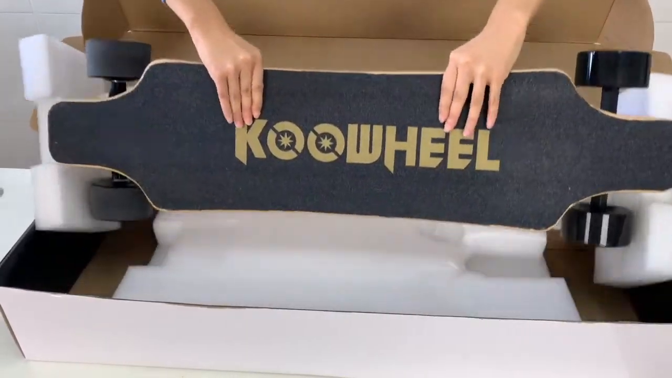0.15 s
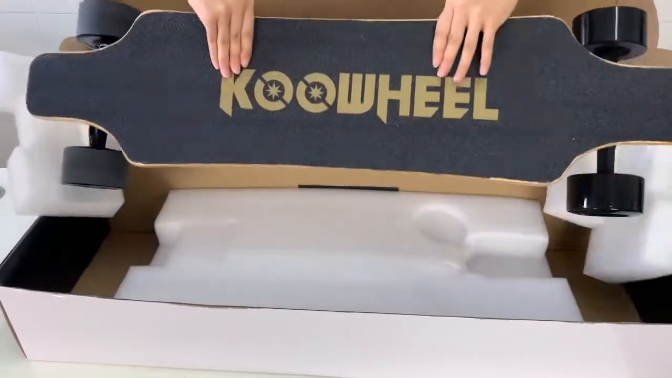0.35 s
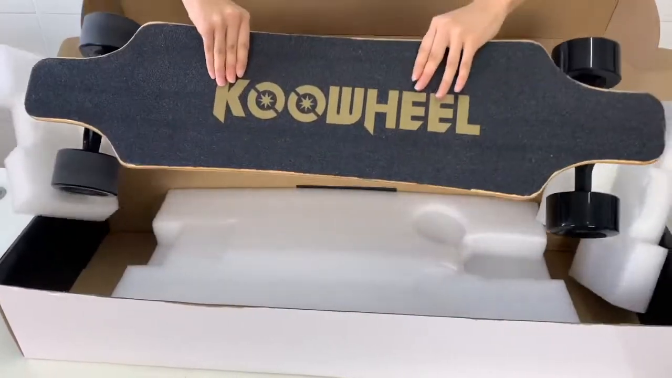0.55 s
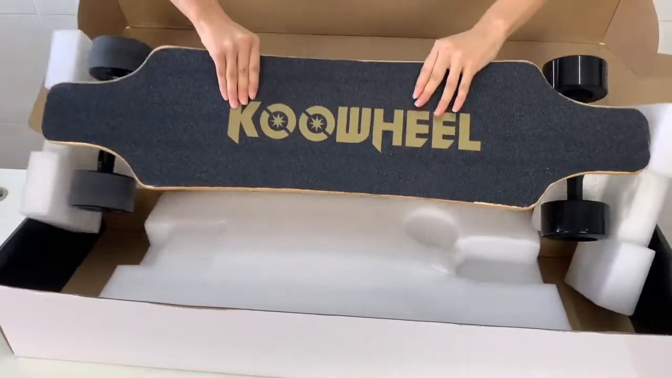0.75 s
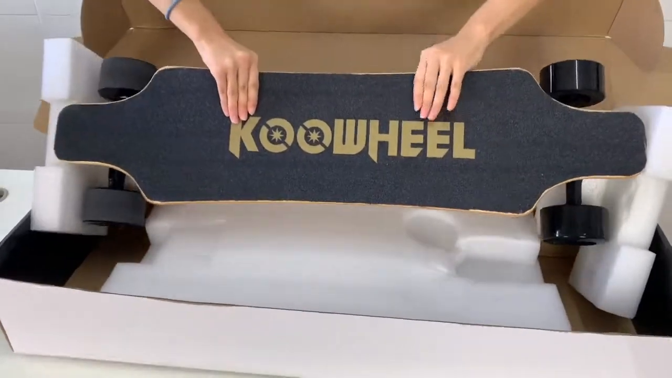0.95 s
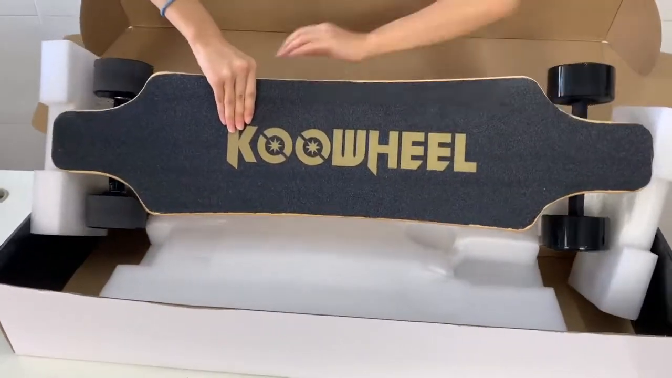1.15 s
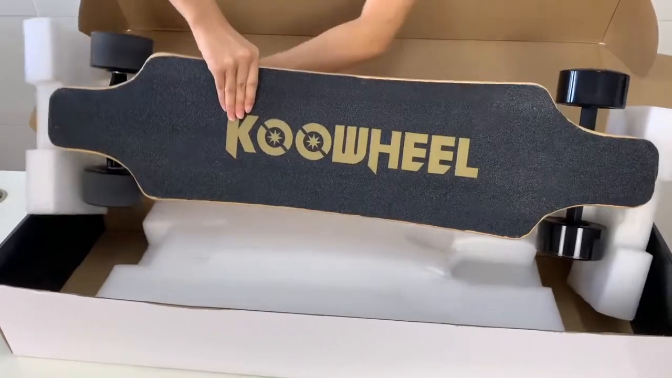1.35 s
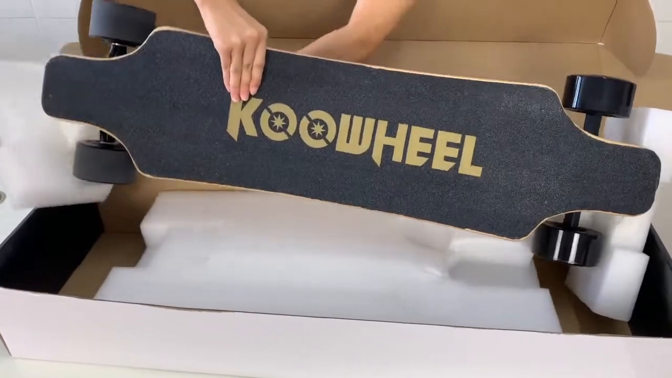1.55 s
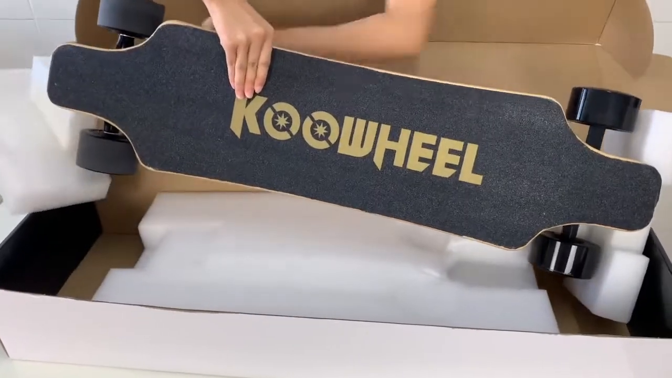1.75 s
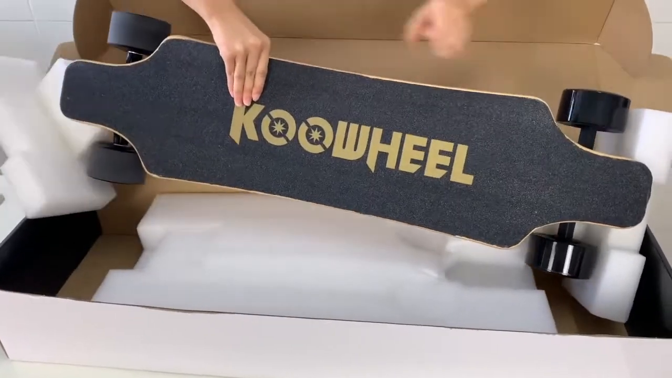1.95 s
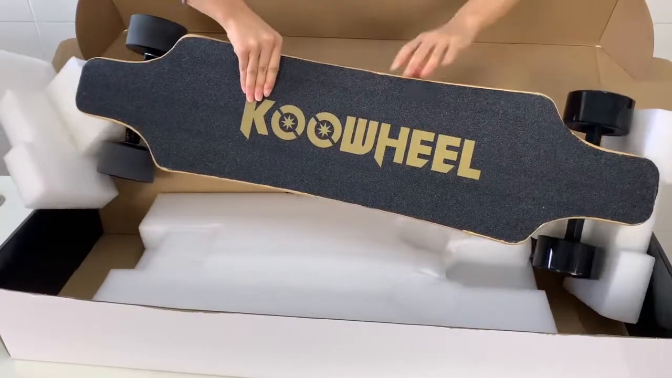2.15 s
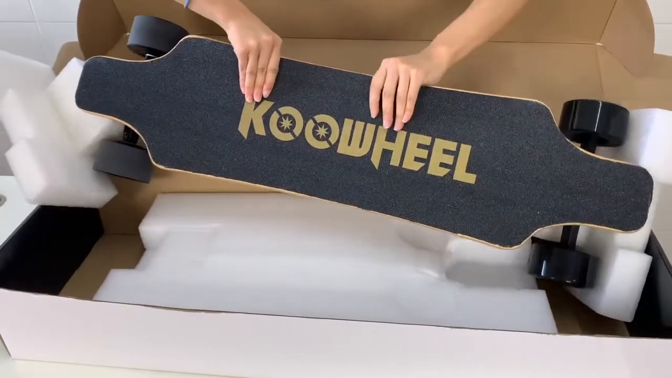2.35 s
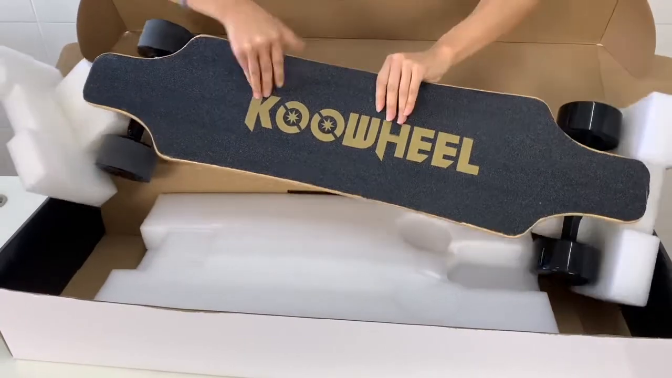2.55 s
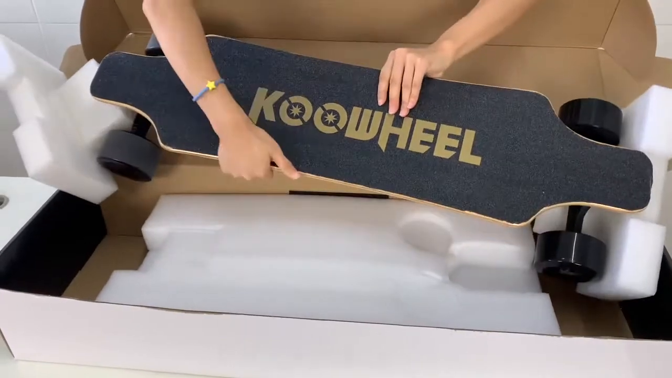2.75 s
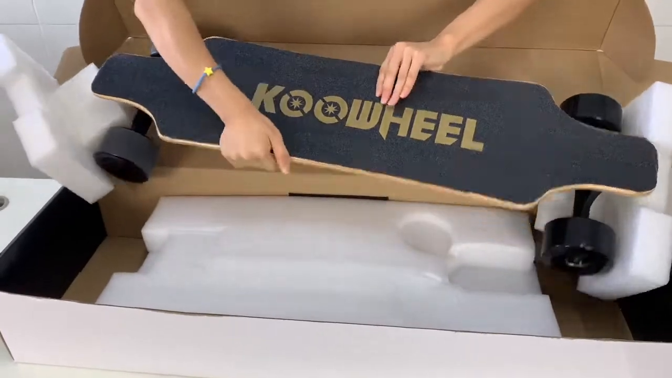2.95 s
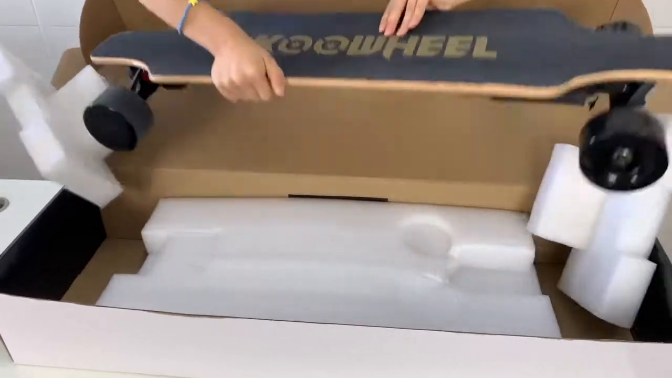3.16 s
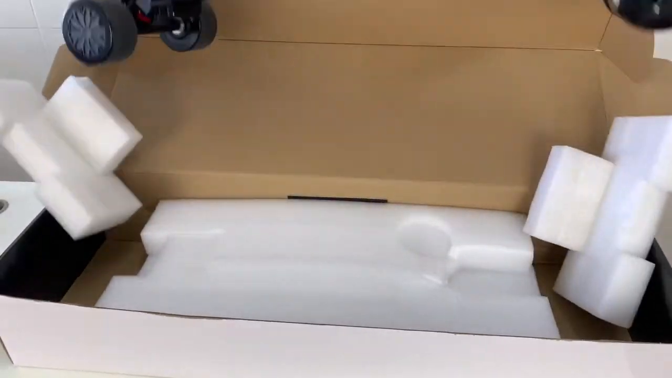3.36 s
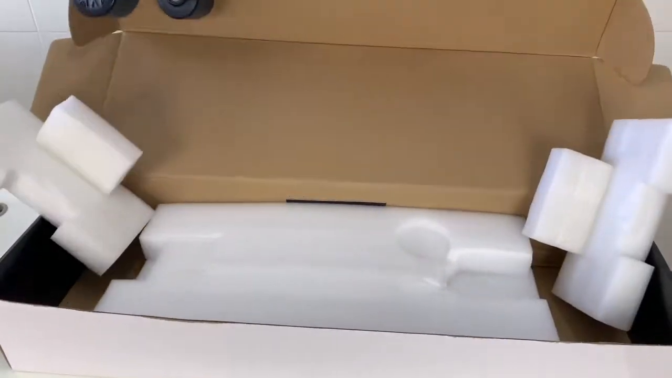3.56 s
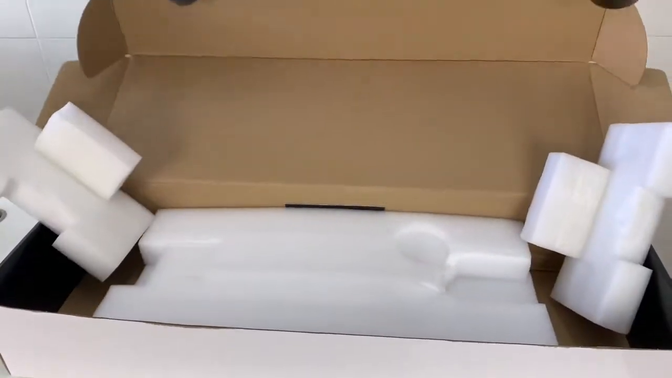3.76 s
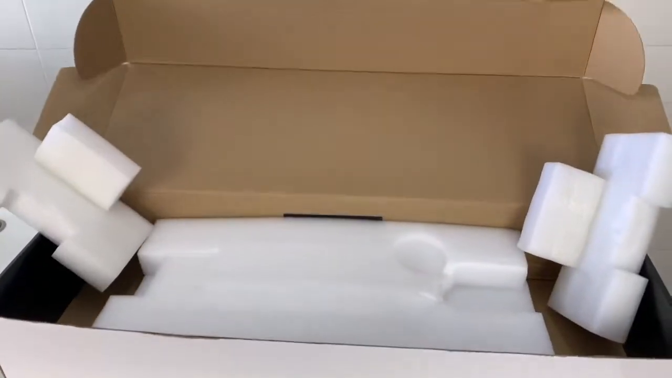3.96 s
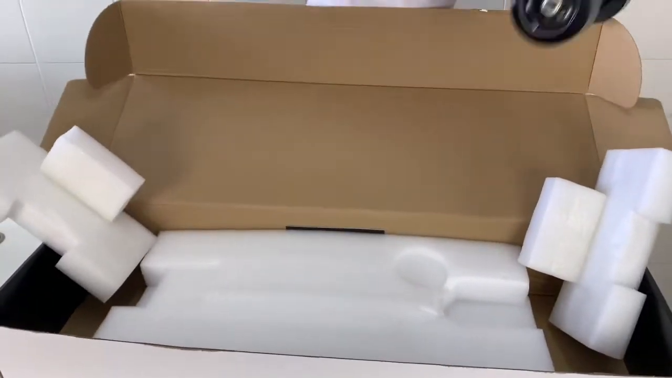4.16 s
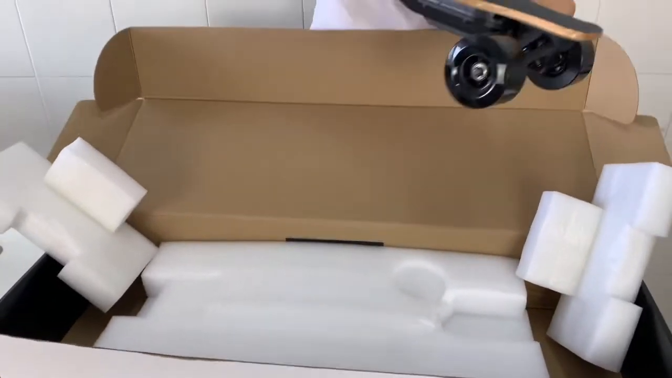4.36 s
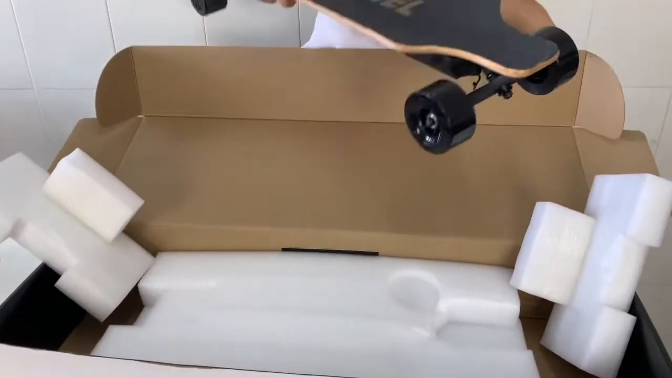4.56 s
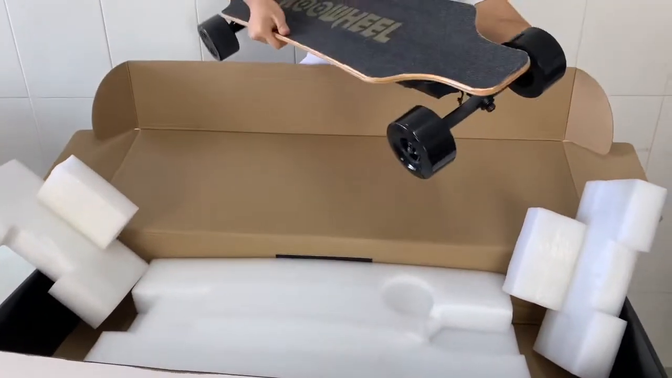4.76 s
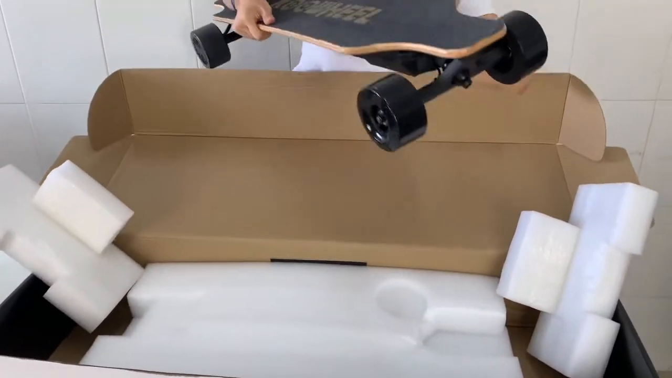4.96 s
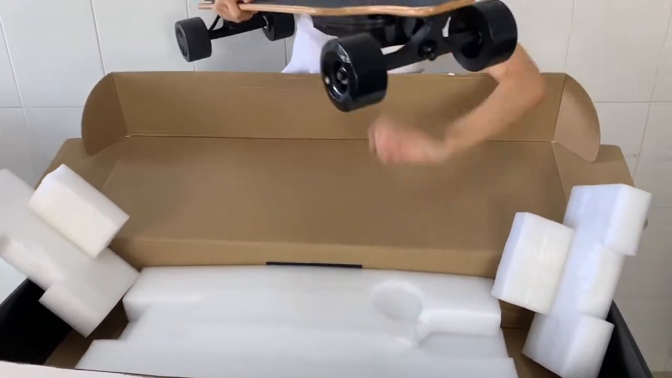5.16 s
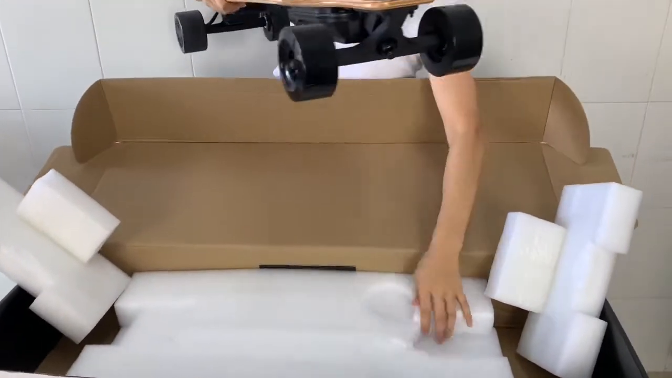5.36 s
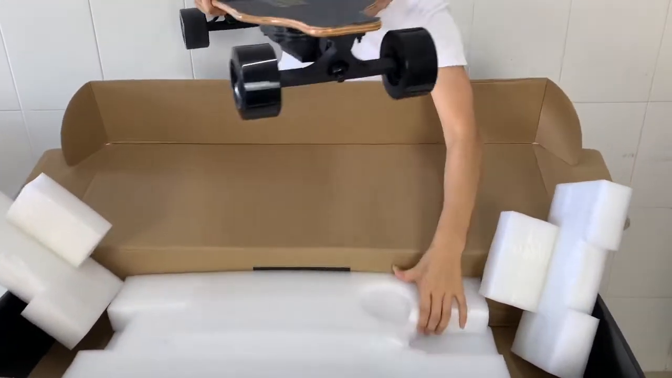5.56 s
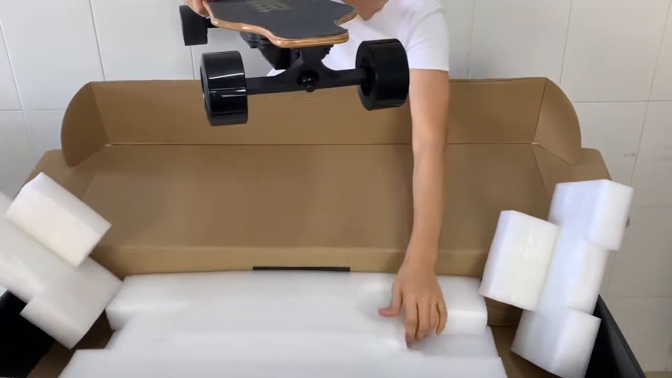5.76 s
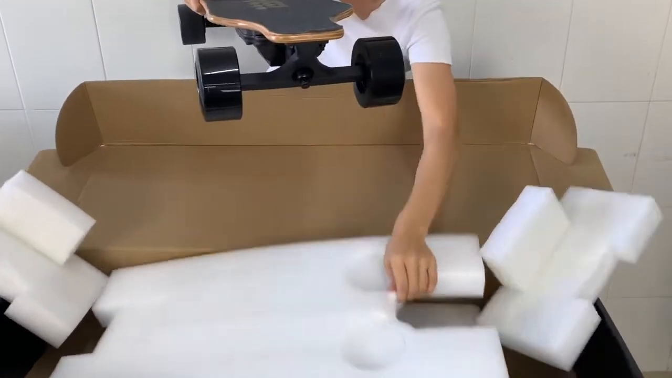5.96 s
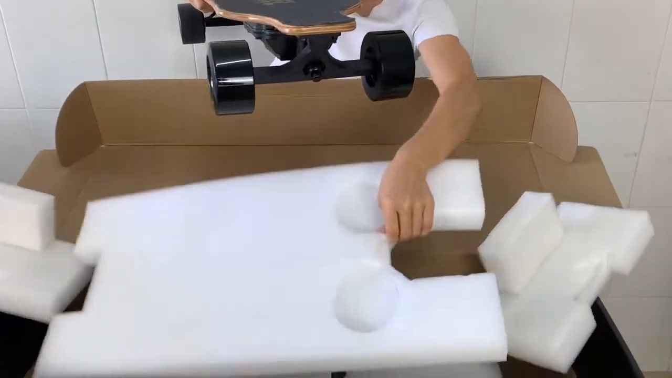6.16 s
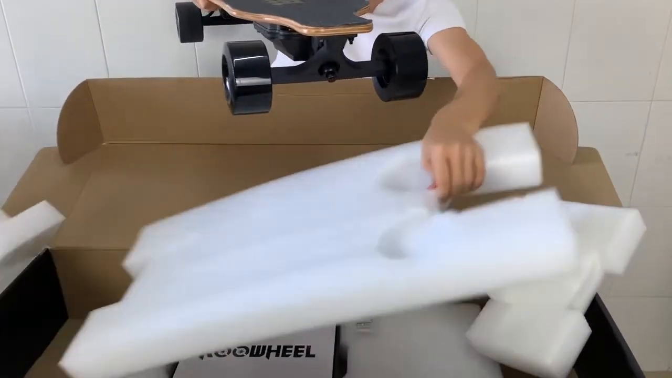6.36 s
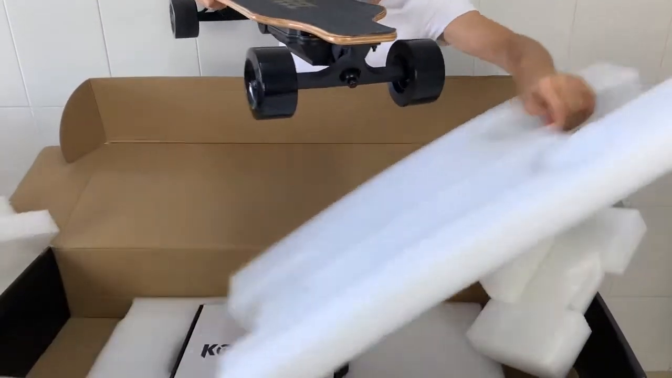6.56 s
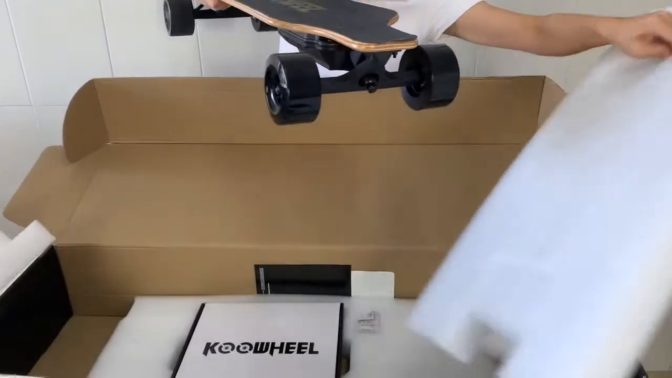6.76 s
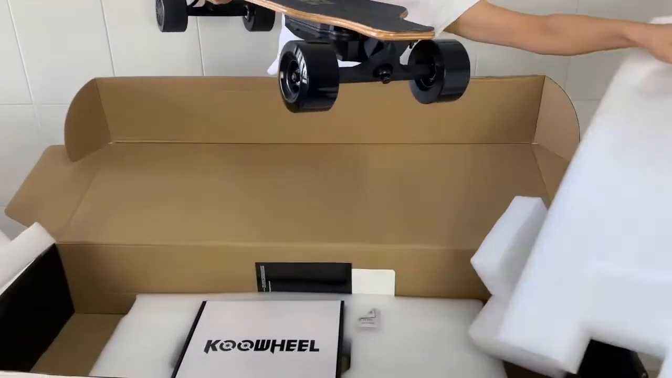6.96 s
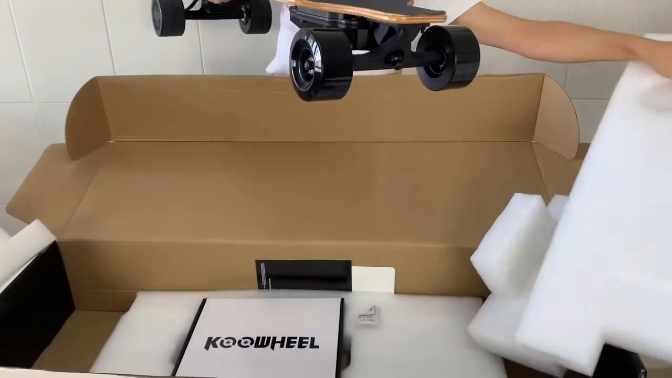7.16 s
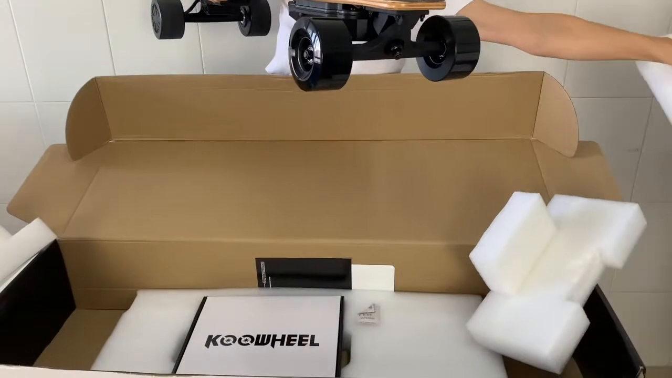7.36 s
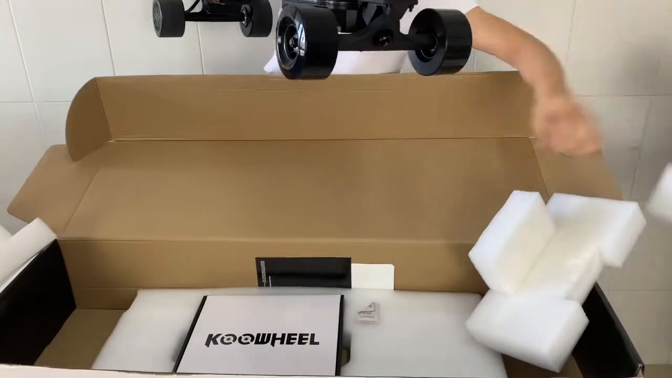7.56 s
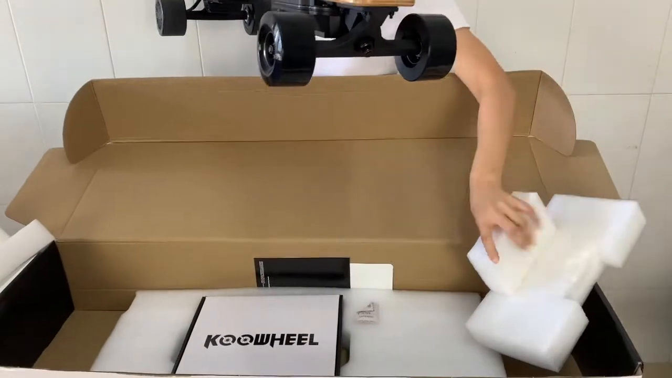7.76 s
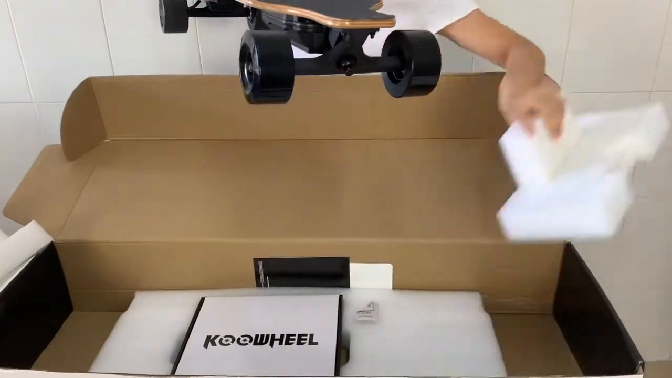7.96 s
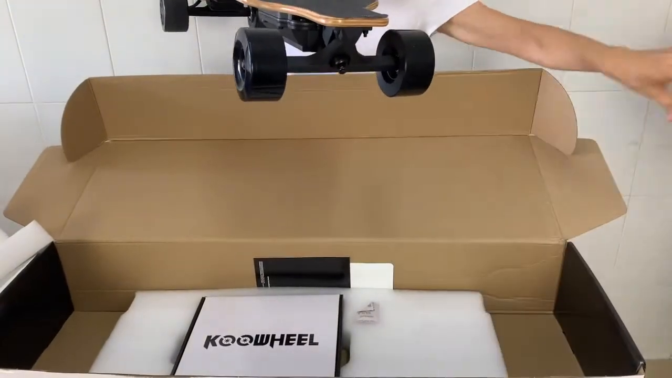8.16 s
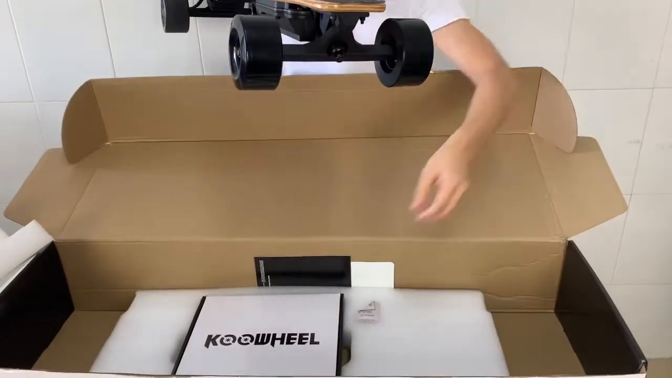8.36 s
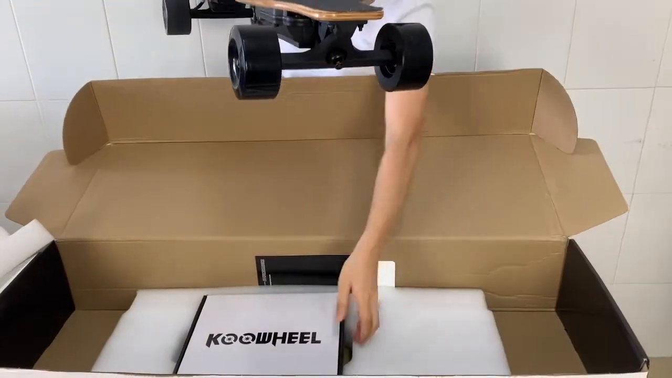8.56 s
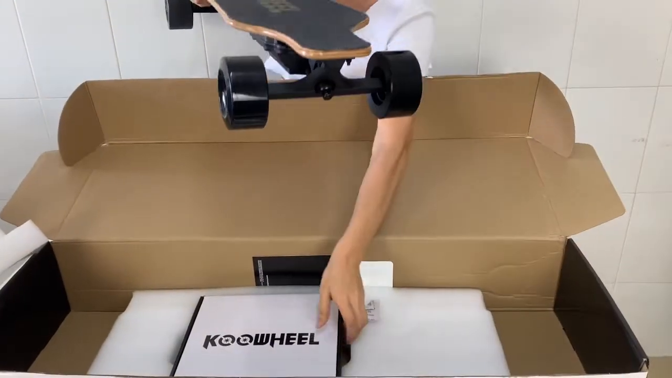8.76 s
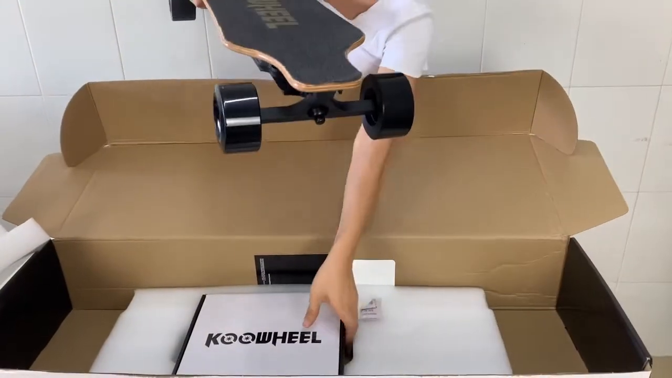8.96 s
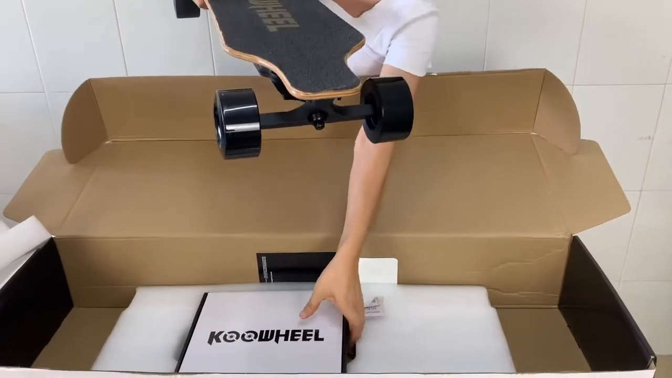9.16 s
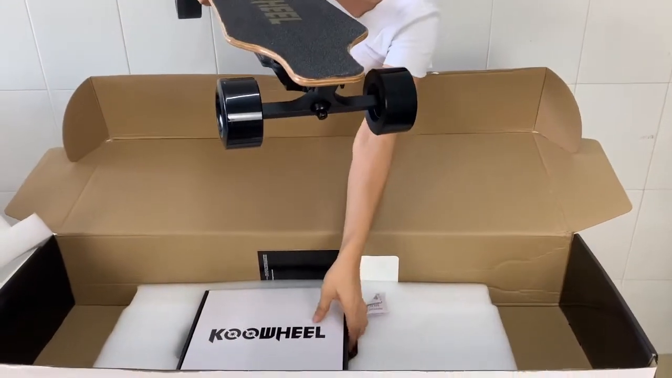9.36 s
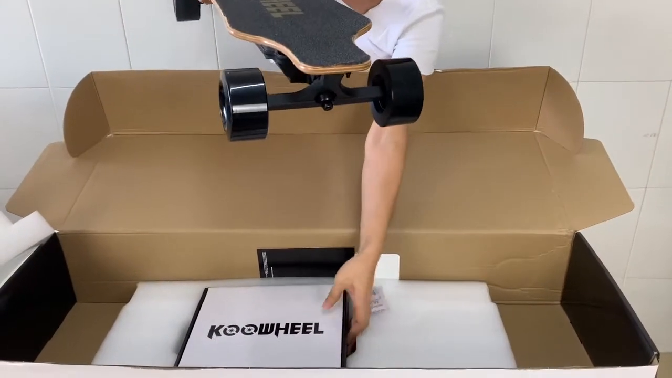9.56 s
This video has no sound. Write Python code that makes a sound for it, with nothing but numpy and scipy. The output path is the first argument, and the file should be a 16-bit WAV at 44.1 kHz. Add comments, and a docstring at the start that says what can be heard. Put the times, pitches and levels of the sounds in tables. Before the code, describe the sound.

Foam packing rubs crisply against cardboard, with sharp little snaps, short squeaks and boxy low knocks crowding the opening. The handling thins after a deep thump, leaving faint rustling over low room tone. Midway the rubbing returns with squeaks and thuds as packing comes away, then a heavy scuff and softer taps. Close microphone, short hard-room reflections, narrow bass and wide midrange.

```python
"""A heavy board is lifted out of a cardboard box on a tiled floor and the foam packing is pulled out after it.
Rubbing foam hisses from the start as shaped noise; snaps, squeaks and scuffs join it as bursts and tones.
Knocks of decaying tones and noise crowd the first second and a half, and a deep one lands near 3.5 s.
After a thinner stretch the rubbing returns from 5.2 s; a strong scuff comes at 8 s, then small knocks.
A quiet hard room answers with decaying noise; the stereo is narrow in the bass and wide in the middle."""
import sys
import numpy as np
from scipy import signal
from scipy.fft import rfft, irfft, next_fast_len
from scipy.io import wavfile
from scipy.ndimage import uniform_filter1d, map_coordinates

SR = 44100
rng = np.random.default_rng(int(sys.argv[2]) if len(sys.argv) > 2 else 0)


def generate_wav(sig):
    """Save sig (samples, or channels by samples) to the path in sys.argv[1] as 16-bit PCM at SR."""
    pcm = np.round(np.clip(np.atleast_2d(sig).T, -1, 1) * 32767).astype(np.int16)
    wavfile.write(sys.argv[1], SR, pcm)


N = 423360  # samples, 9.6 s

# Spectra of the noise layers, relative to each other within a table: f/Hz, level/dB
ROOM_TONE_SPECTRUM = [(33, -27), (41, 0), (53, 6.5), (102, -0.5), (476, -20.5), (560, -18), (734, -13),
                      (1610, -24.5), (1790, -23), (2990, -18), (3340, -25.5), (4370, -23.5), (16000, -105)]
HISS_SPECTRUM = [(900, -12), (1800, 1.5), (2500, 1.5), (4000, 1.5), (5500, -4.5), (7000, -7), (9000, -54),
                 (12000, -71.5)]
SIZZLE_SPECTRUM = [(6000, -12), (8000, 1.5), (10500, 3.5), (13000, -0.5), (15800, -0.5), (16300, -50.5)]
SCRAPE_SPECTRUM = [(250, -17.5), (480, -4.5), (750, 2), (1100, -1.5), (1700, -5.5), (2600, -33)]
RUMBLE_SPECTRUM = [(30, -19), (60, -2), (120, 2.5), (190, -2), (270, -0.5), (390, -4), (520, -11.5),
                   (900, -55)]
# Decay of the room: f/Hz, time to fall 60 dB/s
ROOM_DECAY = [(100, 0.31), (400, 0.38), (1500, 0.39), (5000, 0.27), (14000, 0.031)]
# Likeness of left and right before the phase turn: f/Hz, correlation (0-1)
STEREO_LIKENESS = [(60, 0.93), (290, 0.92), (640, 0.47), (1400, 0.21), (3000, 0.05), (5500, 0), (7500, 1),
                   (16000, 0.69)]
# Phase between left and right: f/Hz, phase/rad
STEREO_PHASE = [(0, 0), (6200, 0), (8600, -np.pi), (13400, -3 * np.pi), (17000, -4.5 * np.pi)]
# Single foam cells that burst: t/s, peak level/dB
SNAPS = [(0.0304, -29.5), (0.606, -30), (1.0684, -28), (1.4662, -13.5), (2.798, -34), (2.8877, -32),
         (3.2796, -20), (5.724, -42), (6.1281, -21), (6.3406, -29), (7.9643, -27), (8.6608, -26)]
# Foam edges that stick and slip: t/s, length/s, f/Hz, level/dB, pitch unsteadiness (0-1)
SQUEAKS = [(0.059, 0.035, 3850, -38, 0.05), (0.076, .025, 3070, -42, 0.06), (0.755, 0.032, 1695, -37, 0.11),
           (0.756, 0.029, 3200, -38.5, 0.07), (0.809, 0.03, 1876, -45, 0), (1.548, 0.082, 4140, -42, 0.06),
           (1.547, 0.046, 1707, -35, 0.24), (1.574, 0.051, 2440, -38.5, .15),
           (2.381, 0.058, 1260, -40.5, 0.17), (2.399, .04, 2240, -38.5, 0.04), (2.412, 0.036, 3970, -39, 0),
           (2.541, 0.0048, 1010, -33, 0), (2.543, 0.011, 1496, -37, 0.13), (2.729, .012, 876, -52, 0.03),
           (3.278, 0.031, 993, -38.5, 0.15), (3.83, 0.051, 734, -49.5, 0.12),
           (4.995, 0.022, 1950, -54, 0.06), (5.215, 0.067, 752, -40, .1), (5.291, 0.072, 716, -34, 0.12),
           (5.433, .035, 1102, -43.5, 0.13), (5.8, 0.035, 2620, -41.5, 0.12),
           (5.807, 0.019, 4560, -37, 0.16), (5.952, 0.043, 4520, -44.5, 0.15),
           (5.991, 0.049, 4770, -42, 0.05), (5.988, 0.046, 6300, -41, 0.12),
           (6.126, 0.004, 4120, -36, 0.04), (6.338, 0.04, 4300, -43.5, 0.03),
           (6.864, 0.049, 1976, -58.5, 0.04), (7.362, 0.015, 1510, -39.5, 0.13),
           (7.393, 0.031, 1177, -50, 0.14), (8.318, 0.037, 1487, -48.5, .08),
           (8.705, 0.0089, 740, -31, 0.08), (8.707, 0.0071, 1280, -44, 0.1),
           (9.218, 0.017, 4440, -53.5, 0.14)]
# Foam that breaks loose: t/s, level before trim/dB, dullness/(dB per octave)
SCUFFS = [(0.0619, -18, -1), (0.231, -26.5, 3), (0.9397, -24, 11), (1.0223, -27.5, 3), (1.194, -28, 0),
          (1.4668, -14, 12), (1.898, -33, -2.5), (2.069, -26, -1), (2.244, -30, 6.5), (2.5424, -26.5, 15),
          (2.9711, -25, 6.5), (3.279, -20, 5.5), (3.4517, -26.5, 9), (3.837, -36, 14), (4.47, -40, 4.5),
          (4.6893, -35.5, 5), (5.214, -34, 3), (5.7257, -29, 5), (5.954, -25, 5), (6.129, -24.5, -3),
          (6.343, -18, -2), (6.433, -20, 0.5), (7.199, -37, 11), (7.3692, -25.5, 7.5), (7.721, -29.5, 13.5),
          (7.782, -27, 16), (7.9627, -20, 8.5), (8.0363, -7.5, 16), (8.316, -29, 11), (8.702, -22, 16),
          (9.222, -34, -4)]
# Ringing parts of the knocks; rows close in time sound as one knock:
# t/s, level before trim/dB, f/Hz, slap over ring before trim/dB
KNOCKS = [(0.461, -29, 127, -11), (0.569, -30.5, 280, -9), (0.683, -20.5, 118, -11), (0.879, -19, 199, -21),
          (0.8921, -15, 201, -19), (1.023, -11.5, 244.6, -9), (1.027, -20, 120, -25),
          (1.068, -23, 346, -23), (1.116, -27.5, 377, -31), (1.469, -7, 379.3, -17),
          (1.469, -10.5, 191, -18), (1.479, -22, 123, -29), (1.502, -21, 166, -39.5),
          (1.507, -16, 372, -28), (1.54, -26, 378, -24), (1.589, -23, 201, -17), (2.01, -16.5, 181.6, -24),
          (2.012, -16, 111, -31), (2.098, -27.5, 238, -49), (2.631, -29, 98, -19), (2.84, -30, 143, -29),
          (3.223, -28, 110, -17), (3.4604, -2, 192, -28.5), (3.715, -27, 233, -29), (3.733, -22, 199, -18),
          (3.935, -27, 182, -24.5), (5.236, -22.5, 251, -50), (5.29, -19.5, 235, -39),
          (5.663, -19, 124, -18), (5.691, -17, 128, -19), (5.724, -17.5, 167, -12),
          (6.341, -16.5, 242.6, -10), (6.342, -19.5, 416, -27), (6.367, -18.5, 149, -14),
          (6.393, -32, 149, -14), (6.749, -19.5, 188, -22), (6.7483, -22, 319, -23), (6.781, -25, 158, -19),
          (6.82, -36, 335, -22), (7.794, -24, 245.5, -13), (7.972, -14.5, 169, -12.5),
          (7.996, -28, 232, -24), (8.032, -15, 321, -10), (8.069, -18, 416, -0.5), (8.664, -32, 238, -25),
          (8.677, -21, 183, -25), (8.715, -21, 390, -11), (8.727, -28, 353, -28), (8.864, -32.5, 199, -5.5),
          (9.262, -29, 351, -3.5), (9.273, -22, 205, -13), (9.29, -27, 242, -14), (9.323, -30.5, 191, -3),
          (9.419, -35.5, 401, -12), (9.441, -38, 366, -7)]
# Panel modes of the box: ratio to the listed pitch, level/dB, loss factor
PANEL_MODES = [(1.03, 0, 1.46), (1.45, -13, 1.04), (2.094, -14.5, 2.9), (3.4, -18, 2.64),
               (0.614, -21, 0.36)]
# Rubbing strokes: peak t/s, build-up/s, fade/s, foam hiss level/dB,
# then over the hiss: fine sizzle level/dB, card scrape level/dB, box rumble level/dB
STROKES = [(0.0, .05, 0.25, -42, -5.5, -0.5, -3.5), (0.112, 0.044, 0.31, -40, -3, -8, -1.5),
           (.5, 0.059, 0.57, -45, -2, -11, 4.5), (.63, 0.13, 0.79, -45.5, -2, 3, 4),
           (.775, 0.067, 0.24, -38, -6, -19, -29), (0.961, 0.081, 0.17, -43, -2.5, 0, 1.5),
           (1.15, 0.36, 0.47, -49.5, -2.5, 0.5, 6.5), (1.38, 0.28, 0.92, -47, -2, -6.5, -17),
           (1.572, 0.15, 0.19, -39.5, 2, -2.5, 6.5), (1.69, 0.31, 0.17, -45.5, -1.5, 1.5, -11),
           (1.97, 0.11, 0.42, -55.5, -2, -3, 4), (2.09, 0.065, 0.4, -50.5, -2, -0.5, -6),
           (2.28, 0.078, 0.34, -56, -1, 6, 10.5), (2.37, 0.068, 0.19, -42, -26, -4, -21),
           (2.426, 0.1, 0.24, -35, 2.5, -2.5, -7.5), (2.81, 0.13, 0.28, -58.5, -12, 5.5, 16),
           (2.99, 0.2, 0.25, -46, -3.5, -9, -8), (3.18, 0.084, 0.17, -51, -7.5, 1, -4),
           (3.3, 0.032, 0.22, -43.5, -2, -11, -12), (3.609, 0.043, 0.14, -56, -1, -1.5, 12.5),
           (3.8, 0.13, 0.23, -56, -1.5, -2, -3), (3.89, 0.034, 0.062, -57.5, 0.5, 8.5, 12),
           (4.08, 0.098, 0.18, -56.5, -15, 5, 7.5), (4.258, 0.23, 0.18, -48.5, -9, 0.5, 5),
           (4.7, 0.03, 0.14, -46, -20, -25, -7), (5.02, 0.1, 0.73, -63, -16, 4, 7.5),
           (5.23, 0.069, 0.13, -48.5, -10, 4, 0), (5.322, 0.099, 0.22, -38, -3.5, 1.5, -0.5),
           (5.438, 0.28, 0.45, -45.5, -5, -0.5, 5.5), (5.819, 0.1, 0.34, -43, -3.5, -0.5, 1.5),
           (6.009, 0.074, 0.18, -37.5, 3.5, -12, -3.5), (6.18, 1, 1, -59.5, -2.5, -8, 2.5),
           (6.363, 0.025, 0.16, -39, -2, -9, 10.5), (6.451, 0.029, 0.19, -50, 4.5, -3, -4),
           (6.85, 0.43, 0.28, -59, -7, -4, 5), (7.3, 0.13, 0.19, -61.5, -10, -11, -7),
           (7.38, 0.062, 0.13, -42.5, -5, -25, -9.5), (7.808, 0.095, 0.15, -46.5, -1.5, -8, 7),
           (7.968, 0.01, 0.22, -41.5, 2, -13, 6), (8.082, 0.093, 0.15, -37, -6, 8.5, 7.5),
           (8.34, 0.049, 0.037, -60.5, -25, 16, -6), (8.6, 0.055, 0.15, -55.5, -6, 2, 6),
           (8.709, 0.085, 0.2, -40, -3, 3.5, 5.5), (8.87, 0.1, 0.31, -49, -2, -5, 4.5),
           (9.0, 0.16, 0.18, -53.5, -7.5, -2.5, -7), (9.28, 0.093, 0.19, -50.5, -5.5, 4.5, 7),
           (9.6, 0.26, 0.12, -55.5, -10.5, -3.5, 2)]
# Fade length over that of the contact (ratio): hiss, sizzle, scrape, rumble
FADE_RATIOS = [0.7, 0.53, 0.83, 0.99]
# The packing settles all the time, level/dB: hiss, sizzle, scrape, rumble
REST_LEVELS = [-97, -81, -62.5, -60]
# Shudder after each row of KNOCKS, level over the listed one/dB: hiss, sizzle, scrape, rumble
SHUDDER_LEVELS = [-65, -67, -42.5, -30]

FIRST_WALL_S = .008  # the room answers this much later
TOP_HZ = 17076
LOSS_S = .02  # the losses below are given per this time
KNOCK_LOSS_DB, SCUFF_LOSS_DB = 14, 9  # the knock's is for a loss factor of 1
HARDNESS = 0.4  # dB gained by the side modes per dB of slap: a hard knock rings more of them
SOFT_DB = -16  # listed slap at which the side modes get no hardness offset
RISE_S = 0.0043  # rise of the first mode, divided by the pitch ratio of each
SLAP_LOWER = 1.57  # the slap has the colour of the card scrape, shifted down by this factor
SNAP_T60_S, SNAP_ROOM_DB = .006, -9
SPAN_DB = 20  # what a stroke gains in its build-up and loses in its fade
BUILD_POWER, FADE_POWER = 1.35, 1.03  # bend of the level in dB against time from the peak
SHUDDER_PEAK_S, SHUDDER_S = .04, .12  # delay of its peak after the knock, then its fade
CRACKLE_PER_S, CRACKLE_S = 500, .0005  # cells that tear in the rubbing, and decay time of each
CRACKLE_DB, CRACKLE_SPREAD_DB = -3, 3.5  # the usual tear over the hiss, and the spread of sizes


def amp(db):
    """Gain of a dB value."""
    return 10 ** (np.asarray(db) / 20)


def unit(x):
    """Scaled to rms 1."""
    return x / np.sqrt(np.mean(x ** 2) + 1e-20)


def along(points, hz):
    """Reads (Hz, value) points on a log frequency axis."""
    f, v = np.transpose(points)
    return np.interp(np.log(hz + 1), np.log(f + 1), v)


def wobble(rate):
    """A smooth random curve, rate knots a second."""
    knots = rng.standard_normal(int(N * rate / SR) + 4)
    return map_coordinates(knots, [np.arange(N) * rate / SR])


def filtered(x, response):
    """x shaped by a complex response of frequency."""
    m = next_fast_len(x.shape[-1] + 8192)
    spectrum = rfft(x, m) * response(np.fft.rfftfreq(m, 1 / SR))
    return irfft(spectrum, m)[..., :x.shape[-1]]


def rush(spectrum, patchy_db):
    """Two unrelated noises of rms 1 sharing patches of random gain in time and frequency."""
    _, _, z = signal.stft(rng.standard_normal((2, N)), SR, nperseg=1024)
    field = uniform_filter1d(rng.standard_normal(z.shape[1:]), size=2, axis=0)
    field = uniform_filter1d(field, size=3, axis=1)
    pair = signal.istft(z * amp(patchy_db * unit(field)), nperseg=1024)[1][:, :N]
    return unit(filtered(pair, lambda hz: amp(along(spectrum, hz))))


def event_canvas():
    """Silence with a spare second for tails, and the time axis of one event."""
    return np.zeros((2, N + SR)), np.arange(SR // 6) / SR


def tails():
    """Two fresh room answers of about energy 1; each frequency dies at its own speed."""
    hz, t = np.fft.rfftfreq(256, 1 / SR), np.arange(0, SR // 3, 128) / SR
    z = rng.standard_normal((2, len(hz), len(t), 2)) @ [1, 1j]
    decay = amp(-60 * t / along(ROOM_DECAY, hz)[:, None])
    tail = signal.istft(z * decay, SR, nperseg=256)[1]
    return tail / np.linalg.norm(tail[0])


def add(out, s, sound, room_db):
    """Places a sound, then its own room answer after the first-wall delay."""
    wet = amp(room_db) * signal.fftconvolve(sound, tails(), axes=1)
    start = round(s * SR)
    out[:, start:start + sound.shape[1]] += sound
    late = start + round(FIRST_WALL_S * SR)
    out[:, late:late + wet.shape[1]] += wet


def room_tone():
    """The quiet room: a low, patchy bed of noise."""
    return amp(-55.5) * rush(ROOM_TONE_SPECTRUM, patchy_db=4.0)


def snaps():
    """A foam cell bursts: a dry, bright crack that falls 60 dB in a few milliseconds."""
    out, _ = event_canvas()
    t = np.arange(SR // 50) / SR
    for s, db in SNAPS:
        noise = rng.standard_normal((2, len(t) + 2))
        bright = noise[:, 2:] - noise[:, :-2]
        crack = bright * np.exp(-np.log(1000) * t / SNAP_T60_S)
        add(out, s, amp(db) * crack / np.abs(crack[0]).max(), SNAP_ROOM_DB)
    return out[:, :N]


def squeaks():
    """A foam edge sticks and slips near one pitch: an unsteady tone with a quick start."""
    out, t = event_canvas()
    for s, length, hz, db, unsteady in SQUEAKS:
        knots = rng.standard_normal((2, 200))
        places = np.meshgrid([0, 1], t * 1000, indexing="ij")  # 1000 knots a second
        drift, flutter = map_coordinates(knots, places, mode="nearest")
        phase = 2 * np.pi * hz * np.cumsum(1 + unsteady * drift) / SR
        channel_phase = [[0], [rng.uniform(0, 2 * np.pi)]]
        tone = np.sqrt(2) * amp(2.2 * flutter) * np.sin(phase + channel_phase)
        shape = (1 - np.exp(-t / 0.0021)) * np.exp(-(t / length) ** 3)
        add(out, s, amp(db) * shape * tone, room_db=-9.5)
    return out[:, :N]


def scuffs():
    """Foam breaks loose at once: a wide burst that the room carries on."""
    out, t = event_canvas()
    for s, db, dull_db in SCUFFS:
        def colour(f):
            tilt = amp(-dull_db * np.log2(f / 4000 + 0.25))
            low_cut = f ** 2 / (f ** 2 + 800 ** 2)
            return tilt * low_cut * amp(-25 * (f > 15900))

        burst = unit(filtered(rng.standard_normal((2, len(t))), colour))
        fade = amp(db - 16.5 - SCUFF_LOSS_DB * t / LOSS_S)  # trimmed by 16.5 dB
        bite = 1 + 0.44 * np.exp(-t / 0.00047)
        add(out, s, fade * bite * burst, room_db=-2.0)
    return out[:, :N]


def panel_ring(hz, slap_db, t):
    """Damped panel modes swell in and die; a stronger slap goes with louder side modes."""
    ring = 0
    for mode, (ratio, level, loss) in enumerate(PANEL_MODES):
        scatter_db = rng.normal(0, 1.5, (2, 1))
        side_db = (mode > 0) * (HARDNESS * (slap_db - SOFT_DB) + scatter_db)
        fade = amp(level + side_db - KNOCK_LOSS_DB * loss * t / LOSS_S)
        rise = (1 - np.exp(-ratio * t / RISE_S)) ** 2
        channel_phase = [[0], [rng.uniform(0, 2 * np.pi)]]
        ring = ring + fade * rise * np.sin(2 * np.pi * hz * ratio * t + channel_phase)
    return ring


def contact_slap(slap_db, t):
    """The surfaces meet: a short noise burst that falls 60 dB in 97 ms."""
    noise = rng.standard_normal((2, len(t)))
    slap = unit(filtered(noise, lambda f: amp(along(SCRAPE_SPECTRUM, SLAP_LOWER * f))))
    return amp(slap_db - 9.0 - 60 * t / 0.097) * slap * (1 - np.exp(-t / 0.00091))  # trimmed by 9 dB


def knocks():
    """Ringing parts of the knocks, each under a short slap; rows close in time sound as one knock."""
    out, t = event_canvas()
    for s, db, hz, slap_db in KNOCKS:
        sound = panel_ring(hz, slap_db, t) + contact_slap(slap_db, t)
        add(out, s, amp(db + 3.5) * sound, room_db=-12.0)  # trimmed up by 3.5 dB
    return out[:, :N]


def swell(peak_s, build_s, fade_s, layer_db):
    """Power of the four rubbing layers over time for one contact."""
    t = np.arange(0, N, 64) / SR - peak_s
    build = (np.maximum(-t, 0) / build_s) ** BUILD_POWER
    fade = (np.maximum(t, 0) / (fade_s * np.c_[FADE_RATIOS])) ** FADE_POWER
    return amp(np.c_[layer_db] - SPAN_DB * (build + fade)) ** 2


def effort():
    """Gain of hiss, sizzle, scrape and rumble: powers of strokes, shudders and rest add up."""
    power = amp(np.c_[REST_LEVELS]) ** 2
    for s, build_s, fade_s, db, *over_db in STROKES:
        power = power + swell(s, build_s, fade_s, db + np.array([0, *over_db]))
    for s, db, *_ in KNOCKS:
        shudder_db = db + np.array(SHUDDER_LEVELS)
        power = power + swell(s + SHUDDER_PEAK_S, SHUDDER_PEAK_S, SHUDDER_S, shudder_db)
    return [np.interp(np.linspace(0, len(p) - 1, N), np.arange(len(p)), np.sqrt(p)) for p in power]


def tearing():
    """Cells tear at random moments: each kicks the gain up, then it decays."""
    sizes = amp(CRACKLE_DB + CRACKLE_SPREAD_DB * rng.standard_normal(N))
    tears = (rng.random(N) < CRACKLE_PER_S / SR) * sizes
    return 1 + signal.lfilter([1], [1, -np.exp(-1 / (CRACKLE_S * SR))], tears)


def rubbing():
    """Foam catches and lets go: hiss and sizzle share stutter and crackle, card takes some stutter."""
    hiss, sizzle, scrape, rumble = effort()
    stutter = 1.3 * wobble(25) + .8 * wobble(350)  # dB
    crackle = tearing()
    foam_noise = crackle * amp(stutter) * rush(HISS_SPECTRUM, patchy_db=4.0)
    fine_noise = crackle * amp(1.56 * stutter) * rush(SIZZLE_SPECTRUM, patchy_db=2.2)
    card_noise = amp(0.47 * stutter + 0.21 * wobble(90)) * rush(SCRAPE_SPECTRUM, patchy_db=5.0)
    box_noise = amp(1.5 * wobble(25)) * rush(RUMBLE_SPECTRUM, patchy_db=1.5)
    foam, fine = hiss * unit(foam_noise), sizzle * unit(fine_noise)
    card, box = scrape * unit(card_noise), rumble * unit(box_noise)
    return foam + fine + card + box


def stereo(pair):
    """The stereo is alike in the bass, wide in the middle, phase-turned in the treble."""
    def share(hz):
        turn = np.arccos(np.clip(along(STEREO_LIKENESS, hz), 0, 1)) / 2
        return np.array([np.cos(turn), np.sin(turn)])

    def half_turn_each(hz):
        phase = np.interp(hz, *np.transpose(STEREO_PHASE))
        return np.exp(.5j * np.outer([1, -1], phase))

    same, other = filtered(pair, share)
    return filtered(np.array([same + other, same - other]), half_turn_each)


def scene():
    """All sources over the room tone, in stereo with slightly unequal channel levels."""
    sources = room_tone() + snaps() + squeaks() + scuffs() + knocks() + rubbing()
    return stereo(sources) * amp([[-.3], [.3]])


def record(dry):
    """Nothing is kept above the band limit."""
    return filtered(dry, lambda hz: hz < TOP_HZ)


dry = scene()
out = record(dry)
generate_wav(out)
```